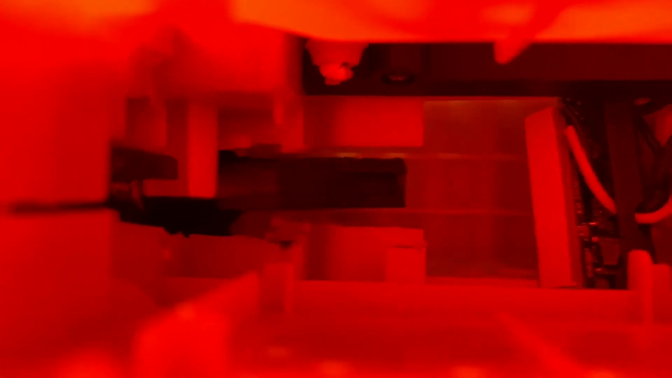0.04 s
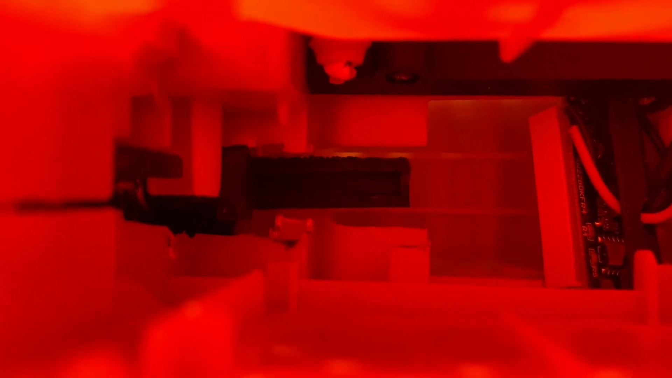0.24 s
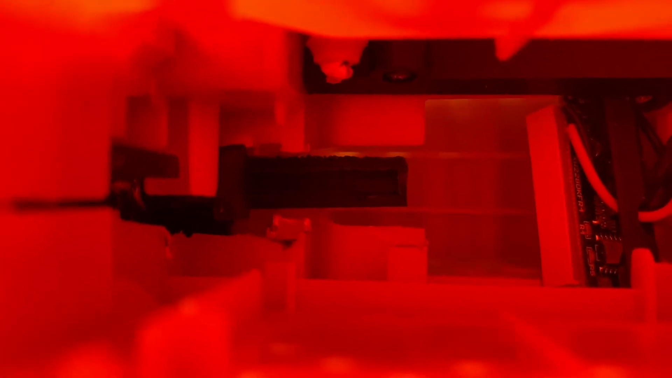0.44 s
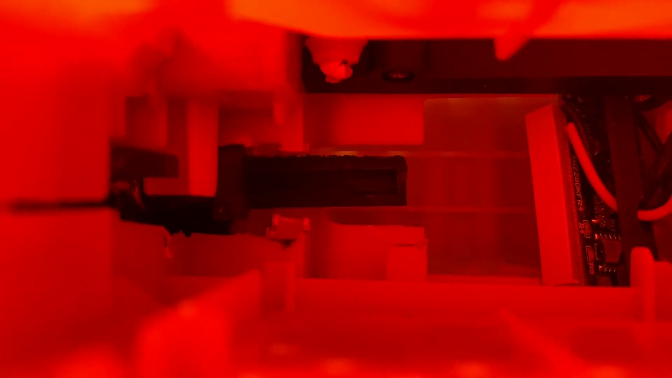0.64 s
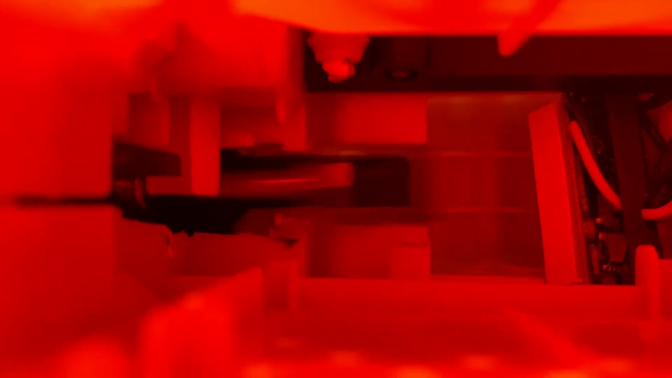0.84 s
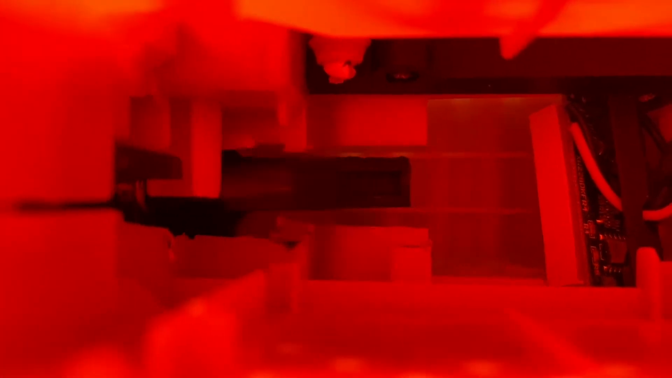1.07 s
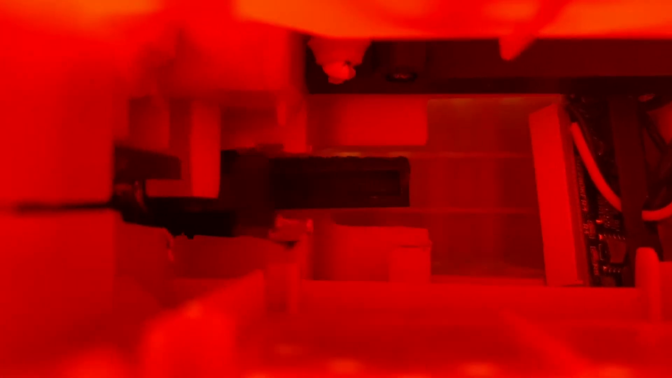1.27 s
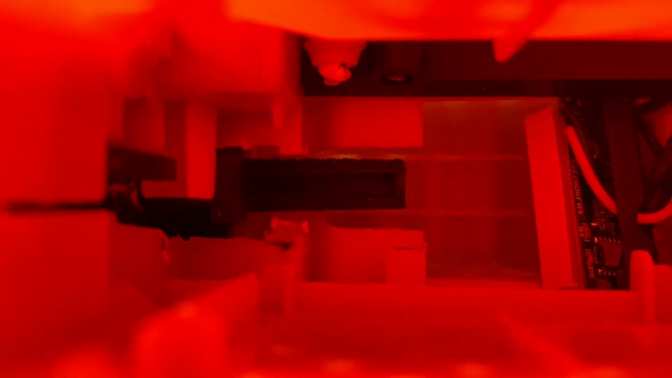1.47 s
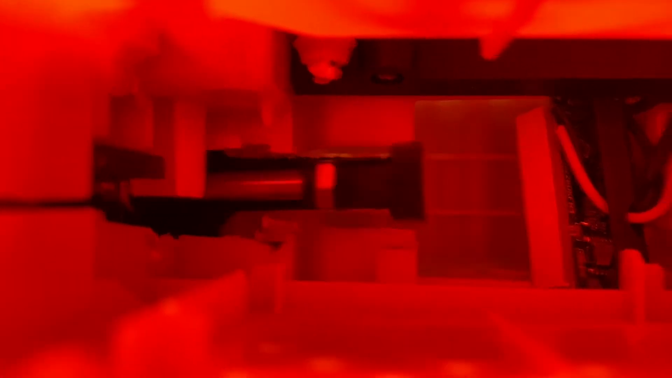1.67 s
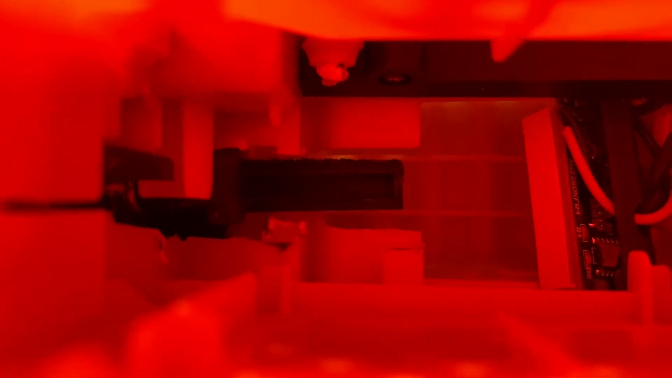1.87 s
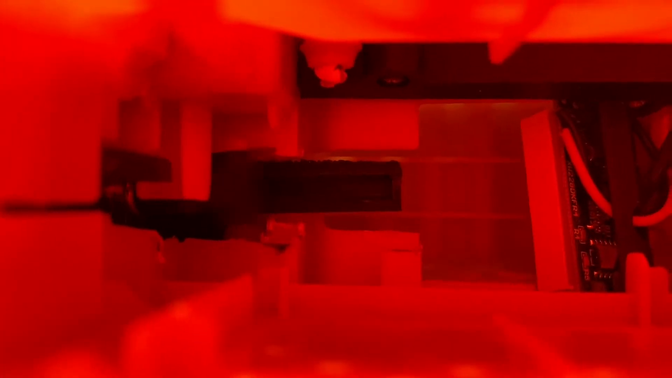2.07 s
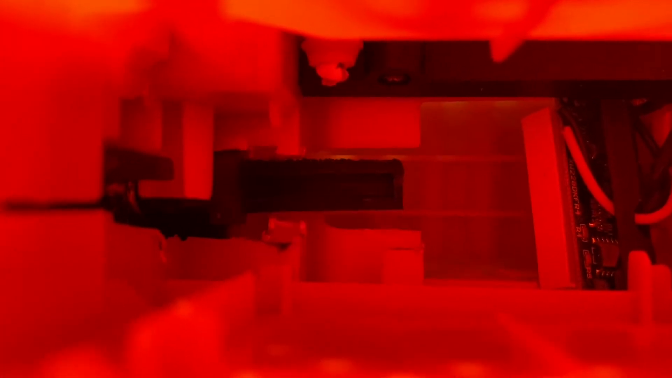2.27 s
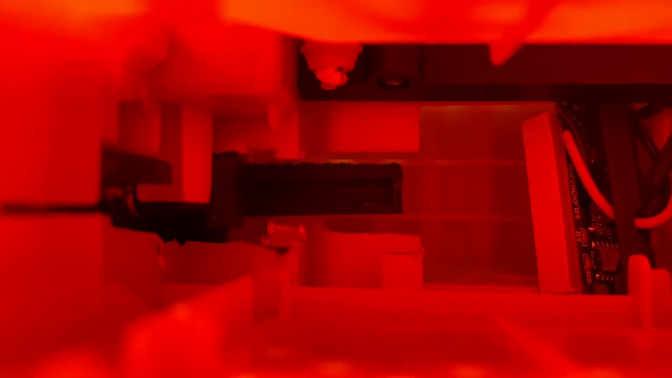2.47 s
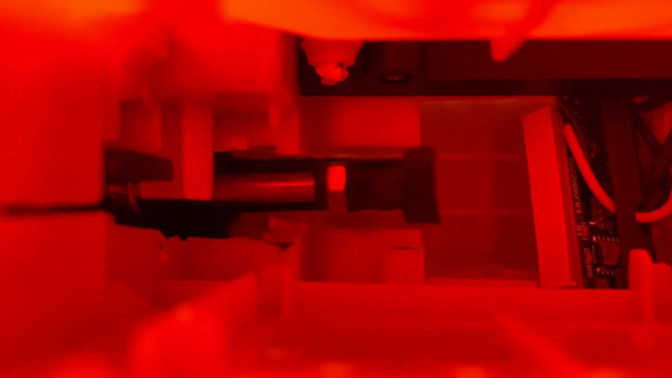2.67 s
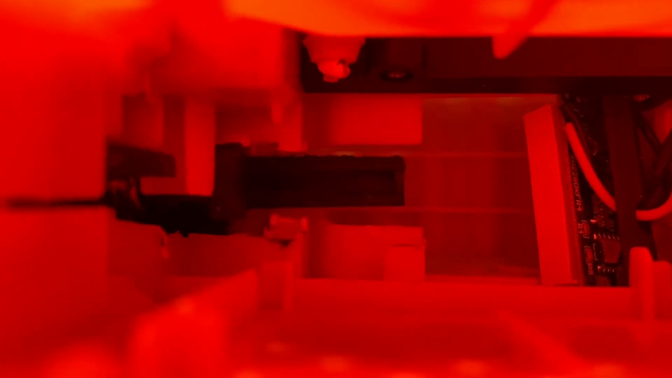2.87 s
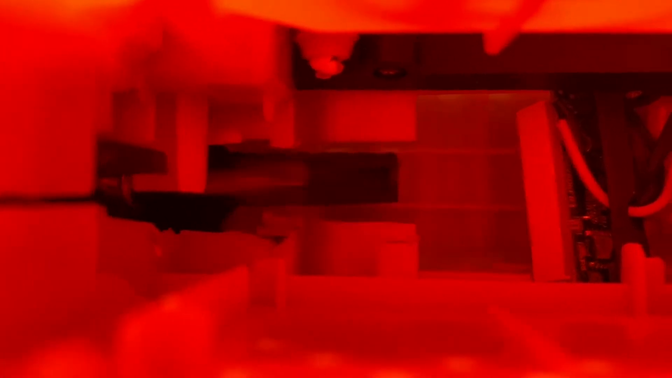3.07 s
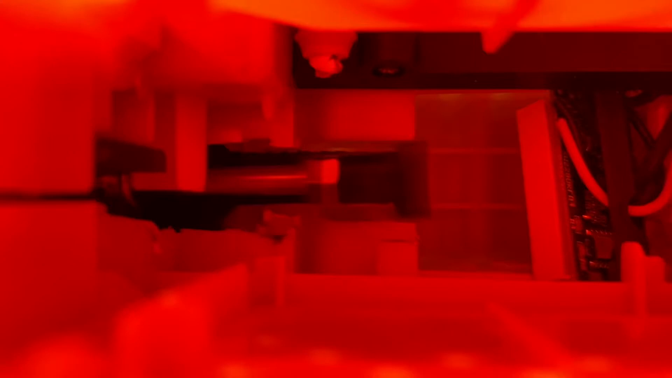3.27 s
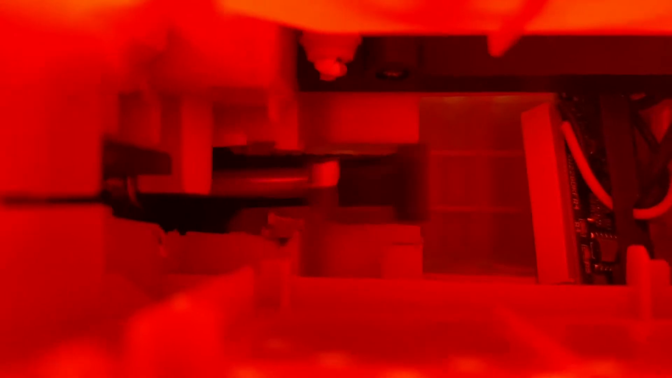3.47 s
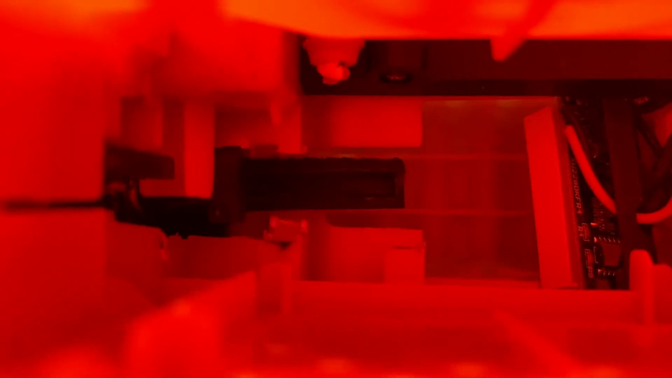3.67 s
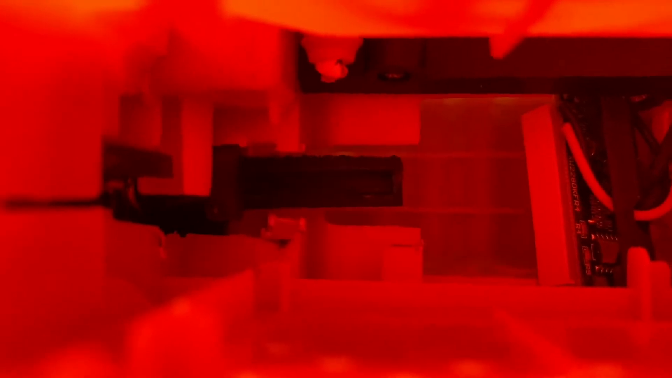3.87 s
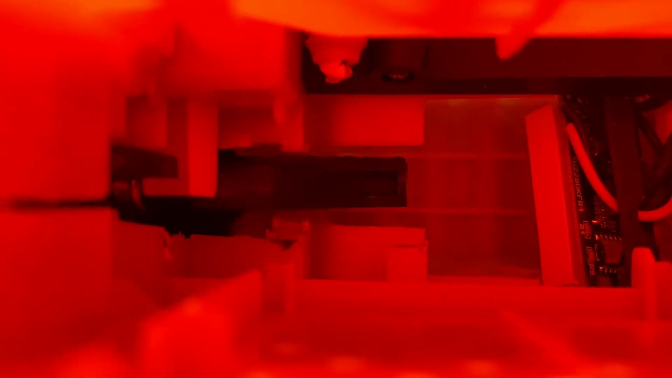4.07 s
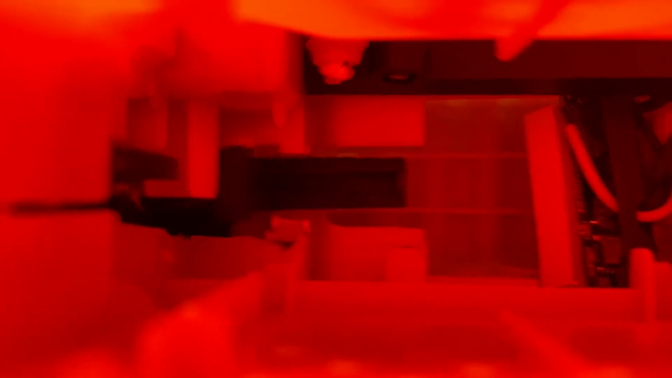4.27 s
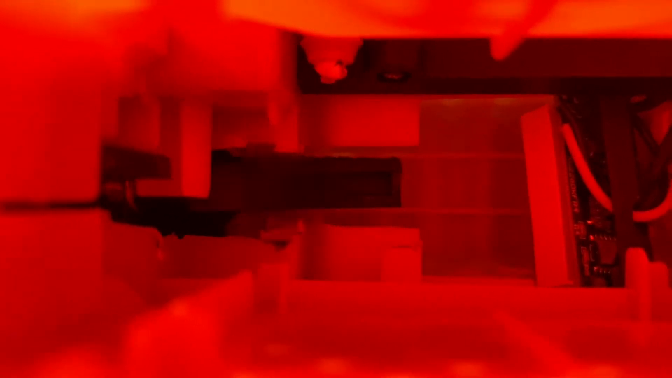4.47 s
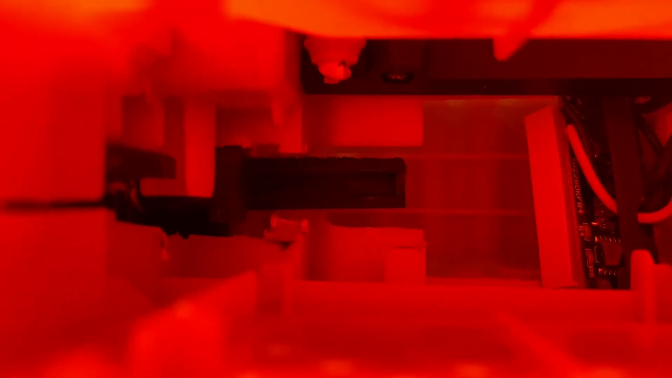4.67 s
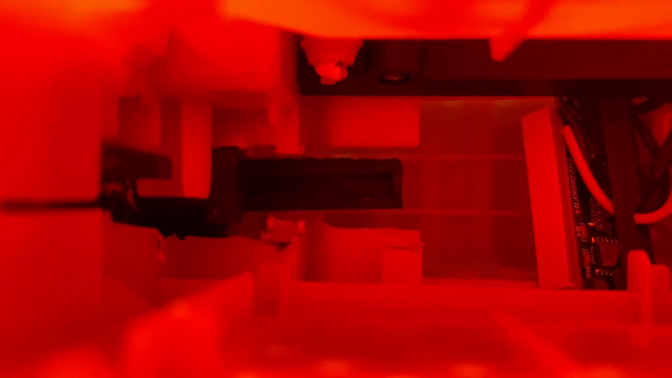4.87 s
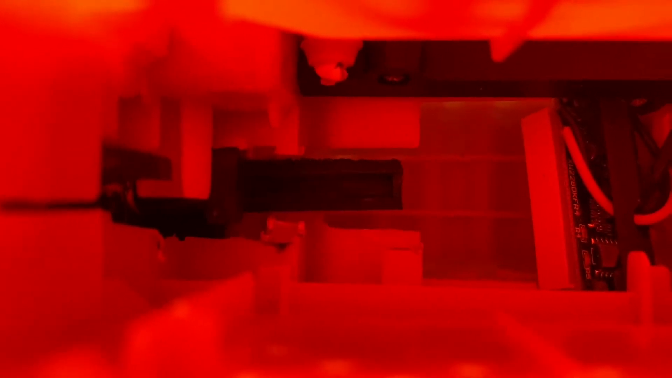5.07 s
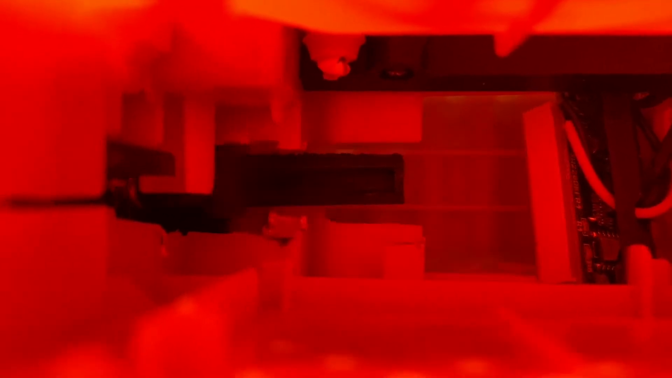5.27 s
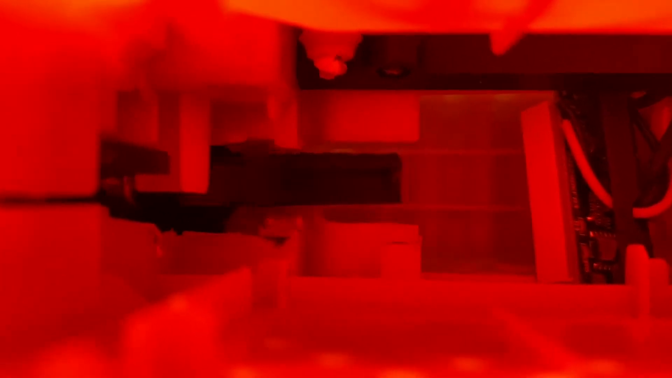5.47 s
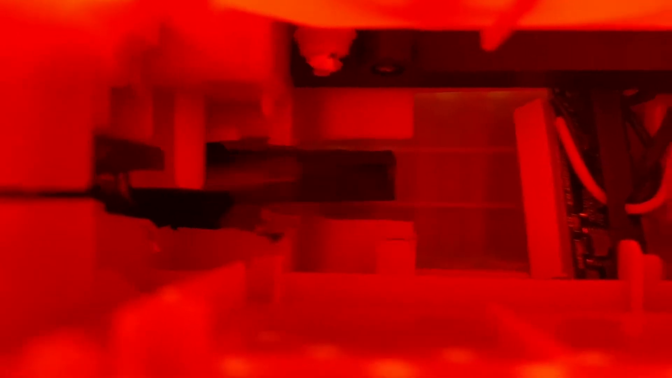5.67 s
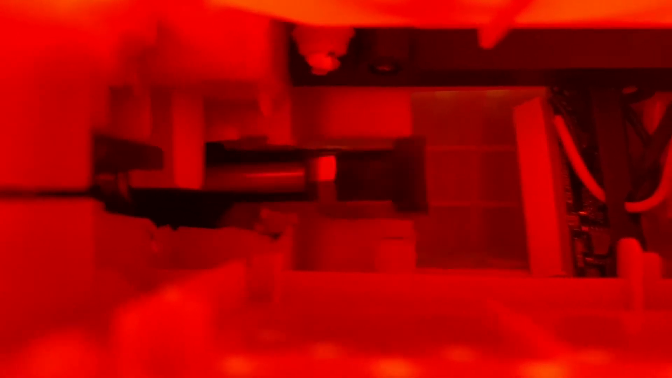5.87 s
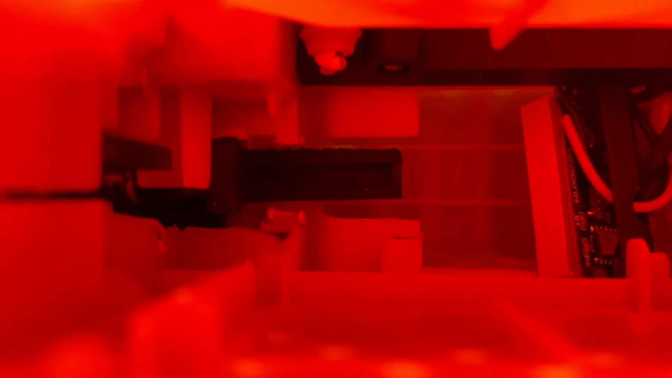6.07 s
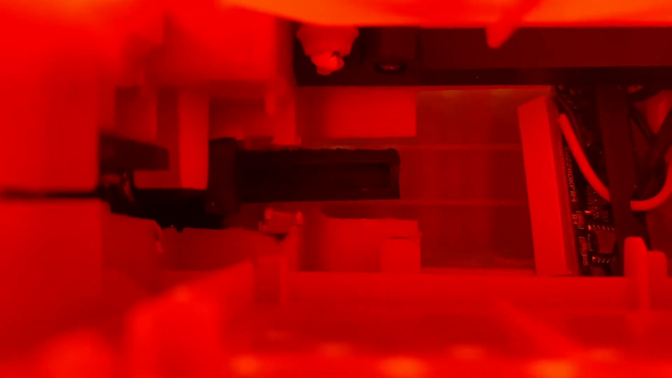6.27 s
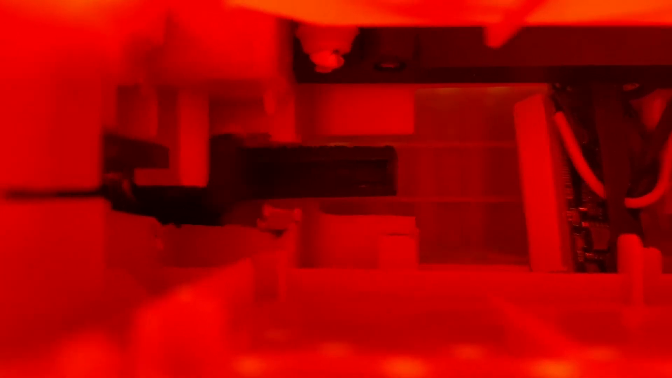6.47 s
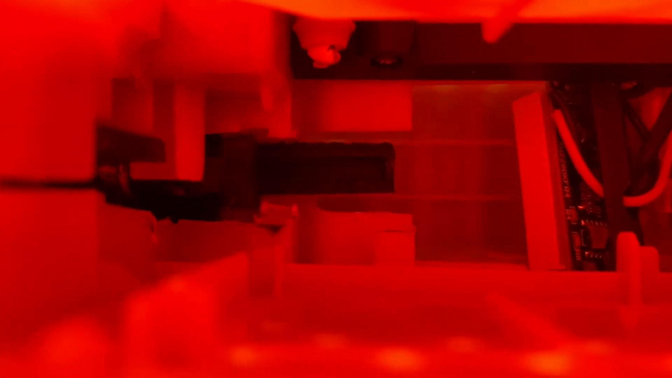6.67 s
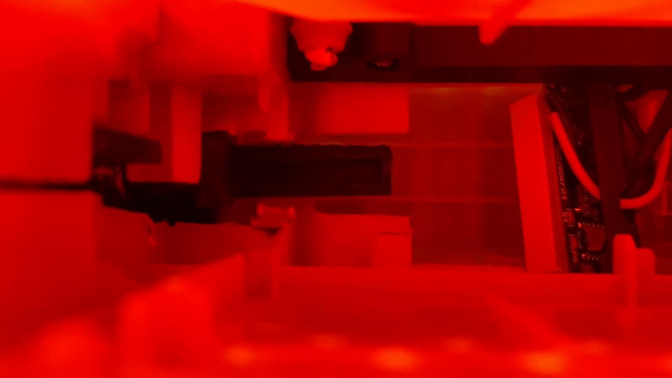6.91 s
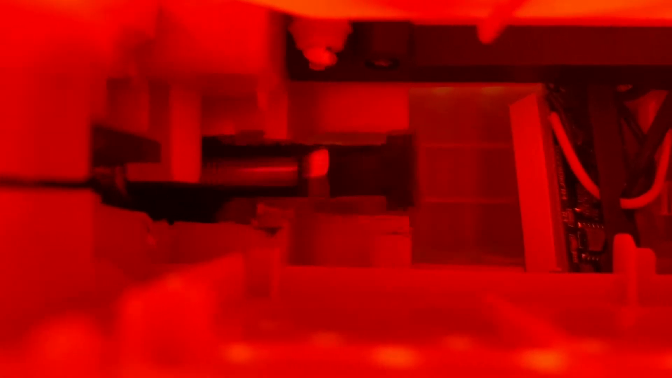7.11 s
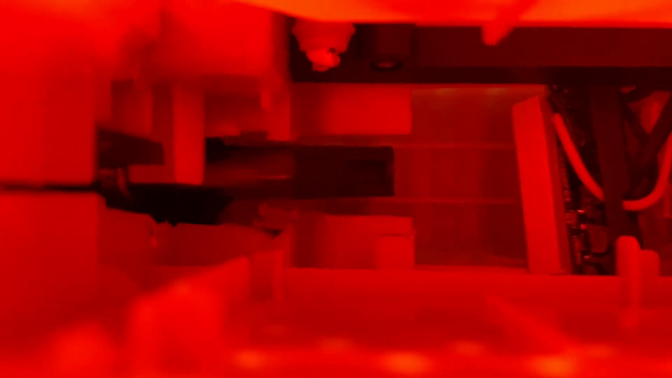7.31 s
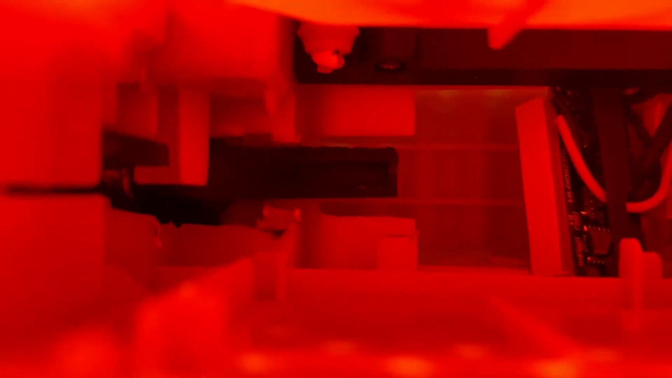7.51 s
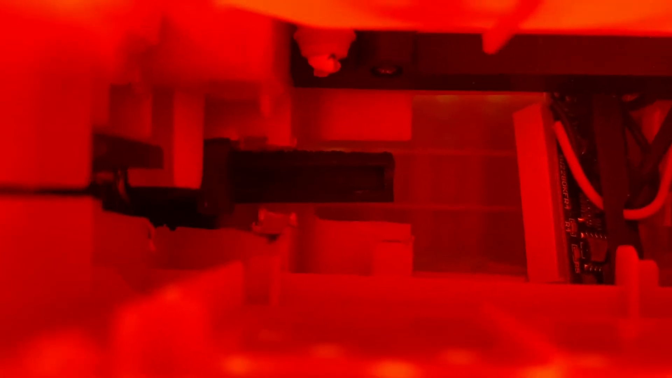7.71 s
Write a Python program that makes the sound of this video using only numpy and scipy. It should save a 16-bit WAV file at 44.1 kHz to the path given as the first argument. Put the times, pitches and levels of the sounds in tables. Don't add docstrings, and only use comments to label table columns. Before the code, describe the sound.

Held right against the microphones, a small solenoid pusher clatters inside a hollow plastic shell. A faint trigger click precedes each burst of hard, fast slams and spring-driven returns, about sixteen cycles a second. Loose parts rattle and buzz briefly afterwards. Short quiet gaps hold finger ticks, soft rubs and low grip rumble in a quiet room. The blows are loud enough to distort.

```python
import sys
import numpy as np
from scipy import signal
from scipy.fft import rfft, irfft, next_fast_len
from scipy.io import wavfile
from scipy.ndimage import map_coordinates

SR = 44100
rng = np.random.default_rng(int(sys.argv[2]) if len(sys.argv) > 2 else 0)


def generate_wav(sig):
    pcm = np.round(np.clip(np.atleast_2d(sig).T, -1, 1) * 32767).astype(np.int16)
    wavfile.write(sys.argv[1], SR, pcm)


def elevation(decibels):
    levels = np.asarray(decibels, float)
    return 10 ** (levels / 20)


N = 341525

# first slam t/s, last return t/s, slam level/dB, return level/dB, switch level/dB
BURSTS = [(-.0965, .0822, -6.5, -6.5, -45), (0.6898, 0.9372, -5, -7.5, -31.5),
          (1.0808, 1.2603, -4.5, -5.5, -45.5), (1.5818, 1.695, -4.5, -3.5, -36.5),
          (2.094, 2.152, -5.5, -5.5, -35), (2.663, 2.711, -4.5, -5.5, -40.5),
          (2.9330, 3.5562, -4.5, -5, -43), (4.0255, 4.5217, -5, -4.5, -44),
          (5.2184, 5.905, -5.5, -5, -38.5), (6.3545, 6.597, -5.5, -6.5, -45.5),
          (6.9527, 7.5113, -5.5, -4.5, -45.5)]
# f/Hz, width f/Hz, level/dB
SHELL_MODES = [(44.7, 13, -14), (77, 8, -8.5), (135, 37, -10.5), (191, 120, -11), (379.7, 93, 0.2),
               (554, 33, 3.3), (732, 110, 0.57), (812, 340, -26.5), (1020, 190, -9.5), (1268, 110, -2),
               (1518, 180, -5.5)]
# f/Hz, width f/Hz, level/dB
PART_MODES = [(2100, 890, -18), (2650, 840, -2.5), (3627, 240, 1), (4233, 280, -3), (4963, 370, 0),
              (6000, 260, -6.5), (7040, 620, -6.5), (7900, 210, -4), (9500, 490, -10), (11150, 240, -7),
              (12700, 1500, -13), (14960, 1600, -20.5)]


def unit(x):
    return x / np.sqrt(np.mean(x ** 2) + 1e-20)


def along(points, hz):
    f, value = np.transpose(points)
    return np.interp(np.log(hz + 1), np.log(f + 1), value)


def filtered(x, response):
    size = next_fast_len(N + SR // 2)
    hz = np.fft.rfftfreq(size, 1 / SR)
    return irfft(rfft(x, size) * response(hz), size)[..., :N]


def ring(force, modes):
    f = np.fft.rfftfreq(32768, 1 / SR)
    early = 2048
    body = 0
    for k, (center, width, db) in enumerate(modes):
        mode = 1j * f * width / (center * center - f * f + 1j * f * width)
        body = body + (-1) ** k * elevation(db) * mode
    return signal.fftconvolve(force, np.roll(irfft(body), early))[early:][:N]


def add(track, s, sound):
    start = round(s * SR)
    sound = sound[max(-start, 0):]
    part = track[max(start, 0):][:len(sound)]
    part += sound[:len(part)]


def grit(count, spiky_db):
    return unit(rng.standard_normal(count) * elevation(spiky_db * rng.exponential(size=count)))


def clumps(count, rate, depth_db):
    knots = np.clip(rng.standard_normal(int(count * rate / SR) + 4), -2, 1.6)
    return elevation(depth_db * map_coordinates(knots, [np.arange(count) * rate / SR]))


def push(t, width):
    return np.exp(-((t - 2 * width) / width) ** 2)


def click(t, hz, t60, drift):
    tone = np.sin(2 * np.pi * hz * t + np.cumsum(rng.normal(0, drift, len(t))))
    return elevation(-60 * t / t60) * (1 - np.exp(-t / 0.00013)) * tone


def returns():
    cycle_s = .0633
    first_hold_s = .0545
    limp_s = .001
    limp_slam_db, limp_return_db = 0.8, -1
    tires_db_per_s = -2.5
    rows = []
    for first, last, slam_db, home_db, _ in BURSTS:
        gaps = round((last - first - first_hold_s) / cycle_s)
        early = np.arange(gaps + 1) % 2
        steady = np.linspace(first + first_hold_s, last + 2 * limp_s * early[-1], gaps + 1)
        for k, s in enumerate(steady - 2 * limp_s * early):
            tired_db = tires_db_per_s * (s - (first + last) / 2)
            limp = early[k] - .5
            db = home_db + tired_db + limp_return_db * limp
            next_db = slam_db + tired_db + limp_slam_db * limp if k < gaps else None
            rows.append((s, db, next_db, early[k]))
    return rows


def slams():
    first_db, first_chatter_s = 1.5, 0.01
    flight_s, limp_flight_s = .0292, 0.00034
    chatter_s, limp_chatter_s = .0135, 0.0093
    rows = [(first, db + first_db, first_chatter_s) for first, _, db, *_ in BURSTS]
    for s, _, db, early in returns():
        if db is not None:
            length = limp_chatter_s if early else chatter_s
            rows.append((s + flight_s + limp_flight_s * early, db, length))
    return rows


def room_air():
    # f/Hz, level/dB per Hz
    air_curve = [
        (15, -31.5),
        (25, 5),
        (55, 3.5),
        (394, -18),
        (427, -10.5),
        (887, -31),
        (1650, -31.5),
        (16000, -43.5),
    ]
    apart = lambda f: np.clip(f / 700, .15, 1)
    shape = lambda f: elevation(along(air_curve, f)) * [np.ones_like(f), apart(f)]
    mid, side = filtered(rng.standard_normal((2, N)), shape)
    return elevation(-67.5) * np.array([mid + side, mid - side]) / np.std(mid)


def grip():
    # t/s, level/dB, f/Hz, half length t/s
    grip_shifts = [(0.178, -35.5, 69, 0.092), (.33, -44.5, 111.5, 0.03), (0.355, -45.5, 71.2, 0.053),
                   (.31, -52, 251, .025), (0.25, -45, 426, 0.021), (.38, -52, 153.5, 0.076),
                   (.46, -54.5, 124.4, 0.079), (0.545, -52, 390, 0.012), (1.403, -45, 50, 0.056),
                   (1.916, -58, 50.2, 0.06), (2.266, -32, 467, 0.0065), (2.338, -50, 60.4, 0.05),
                   (3.797, -47, 72.9, 0.058), (3.944, -63, 70, 0.042), (6.019, -48, 69.6, .05),
                   (6.135, -66, 300, 0.012), (6.799, -58, 70, 0.05), (7.671, -53, 59.4, 0.056)]
    out, t = np.zeros(N), np.arange(-6000, 6000) / SR
    for s, db, hz, half in grip_shifts:
        drift = np.cumsum(rng.normal(0, .04, len(t)))
        add(out, s + t[0], elevation(db) * np.exp(-(t / half) ** 2) * np.sin(2 * np.pi * hz * t + drift))
    return out


def background():
    return room_air() + grip() * elevation([[.4], [-.4]])


def rubs():
    # t/s, level/dB, half length t/s
    finger_slides = [
        (0.576, -64, .02),
        (2.035, -65.5, 0.037),
        (2.58, -65, .03),
        (3.847, -70, .012),
        (5.071, -73, .035),
        (6.205, -70, 0.026),
    ]
    force, t = np.zeros(N), np.arange(-3000, 3000) / SR
    for s, db, half in finger_slides:
        swell = np.exp(-(t / half) ** 2)
        add(force, s + t[0], elevation(db + 11) * swell * grit(len(t), spiky_db=1.5))
    return ring(force, [(3200, 500, -6), (5100, 840, 0.0)])


def ticks():
    # t/s, level/dB, f/Hz, knock share level/dB
    finger_ticks = [(0.2266, -40.5, 2690, 10), (0.2652, -49.5, 8100, 4), (0.408, -65.5, 7700, 3),
                    (0.5284, -37.5, 2310, 5), (0.571, -51.5, 3030, 5.5), (0.619, -42, 3095, -21.5),
                    (1.4724, -62, 2920, -2.5), (1.89, -47, 3450, 2.5), (1.906, -53, 4740, -2),
                    (2.0295, -51.5, 2000.0, 0), (2.5612, -58, 5100.0, -10), (3.6932, -54, 2485, 8),
                    (3.8096, -45, 2390, 1), (3.8463, -59.5, 3020, 1.5), (3.8852, -57, 3023, -1.5),
                    (3.9119, -53.5, 3070, -18.5), (3.9344, -50, 3030, -12), (3.9496, -61, 2250, -21.5),
                    (3.9706, -61, 2250, -11.5), (4.6497, -47.5, 7880, -9), (4.6577, -57.5, 7900.0, -1.0),
                    (5.0966, -59.5, 3094, -15), (5.1327, -53, 3200.0, -26), (5.1514, -48.5, 2940, -14),
                    (6.1445, -56, 1533, 13.5), (6.1706, -50, 2100.0, 4), (6.1988, -63, 3200.0, -11.5),
                    (6.2734, -57, 3200.0, -12.5)]
    # f/Hz, width f/Hz, level/dB
    switch_modes = [
        (2250, 130, 2.5),
        (3200, 1200, -1),
        (4900, 250, 1),
        (7500, 2200, -14.5),
    ]
    switch_lead_s, switch_hz, switch_knock_db = .0372, 3150, -17.5
    closings = [(s - switch_lead_s, db, switch_hz, switch_knock_db) for s, *_, db in BURSTS]
    tone, force, knock, t = np.zeros(N), np.zeros(N), np.zeros(N), np.arange(1500) / SR
    for s, db, hz, knock_db in finger_ticks + closings:
        start = s - .0005
        contact = elevation(-60 * t / 0.019) * (1 - np.exp(-t * 4000))
        add(tone, start, elevation(db - 4) * click(t, hz, t60=.03, drift=.05))
        add(force, start, elevation(db + 7.0) * contact * grit(len(t), spiky_db=2.0))
        add(knock, start, elevation(db + knock_db + 15.5) * push(t, width=0.000087))
    return tone + ring(force, switch_modes) + ring(knock, SHELL_MODES)


def settling(time):
    # length t/s, first level/dB, last level/dB
    buzz_slopes = [(.11, -34, -37.5), (0.073, -39.5, -33), (.065, -38.5, -35), (0.11, -19.5, -31.5),
                   (0.1, -24, -38.5), (.08, -26, -28.5), (0.067, -39, -33.5), (0.071, -34.5, -35.5),
                   (.067, -40, -37.5), (0.11, -24.5, -36.5), (0.069, -37, -38.5)]
    wait_s, rest_s, rest_db = .0095, .031, -60
    level = 0
    for (_, last, *_), (length, first_db, last_db) in zip(BURSTS, buzz_slopes):
        since = time - last - wait_s
        corners_s, corners_db = [0, length, length + rest_s], [first_db, last_db, rest_db]
        level = level + elevation(np.interp(since, corners_s, corners_db, left=-200, right=-200))
    return level


def scrape():
    buzz = unit(clumps(N, rate=200, depth_db=2.5) * grit(N, spiky_db=2))
    force = settling(np.arange(N) / SR) * buzz
    return elevation(7.0) * ring(force, PART_MODES) + elevation(19.0) * ring(force, SHELL_MODES)


def shaken():
    # t/s from slam, level/dB under it, scatter level/dB
    guide_clip = (-.0118, -8, 2.5)
    guide_pitches = [2570, 3300, 4800, 7100, 7800]
    # t/s from that return, level/dB under it, f/Hz, scatter level/dB
    spring_ping = (0.02, -12, 11198, 2)
    # t/s from slam, level/dB under it, f/Hz
    seat_drop = (.035, -25, 4600)
    # t/s from slam, level/dB under it, f/Hz, scatter level/dB
    coil_jiggle = (-0.0032, -8, 8200.5, 2)
    guide_s, guide_db, guide_scatter_db = guide_clip
    ping_s, ping_db, ping_hz, ping_scatter_db = spring_ping
    seat_s, seat_db, seat_hz = seat_drop
    jiggle_s, jiggle_db, jiggle_hz, jiggle_scatter_db = coil_jiggle

    strokes = slams()
    opening, later = strokes[:len(BURSTS)], strokes[len(BURSTS):]
    luck = rng.standard_normal((len(later), 4))
    pick = rng.choice(guide_pitches, len(later))
    rows = [(s + seat_s, db + seat_db, seat_hz) for s, db, _ in opening]
    for (s, db, _), (a, b, c, d), hz in zip(later, luck, pick):
        rows.append((s + guide_s + .0015 * a, db + guide_db + guide_scatter_db * b, hz))
        rows.append((s + jiggle_s + .003 * c, db + jiggle_db + jiggle_scatter_db * d, jiggle_hz))
    for s, db, _, early in returns():
        if early:
            a, b = rng.standard_normal(2)
            rows.append((s + ping_s, db + ping_db + ping_scatter_db * a, ping_hz * (1 + .08 * b)))
    return rows


def rattles():
    # t/s, level/dB, f/Hz
    tumbles = [(0.1018, -20, 2480), (0.144, -23.5, 6540), (0.1624, -20.5, 5880), (.197, -24.5, 4620),
               (0.9848, -18.5, 7800), (1.0064, -25.5, 7800), (1.3053, -18, 6580), (1.7183, -15.5, 8130),
               (1.7568, -12, 6120), (1.798, -19.5, 10650), (2.1693, -13.5, 3300), (2.1791, -22, 2440),
               (2.198, -7.5, 2390), (2.2066, -9, 7900), (2.2576, -24.5, 9650), (2.752, -13.5, 7800),
               (2.769, -3, 4800), (2.7991, -18.5, 6600), (2.8315, -23.5, 7900), (3.5708, -19.5, 7900),
               (3.6012, -17.5, 7800), (3.6088, -18.5, 6480), (4.5697, -19.5, 7690), (5.9256, -23.5, 4163),
               (5.9519, -20.5, 6530), (6.626, -21.5, 8910), (6.6475, -4, 5930), (6.678, -20, 6650),
               (7.5498, -22.5, 7630), (7.5741, -21.5, 7800)]
    tone, force, t = np.zeros(N), np.zeros(N), np.arange(1500) / SR
    for s, db, hz in tumbles + shaken():
        add(tone, s - .001, elevation(db - 4.0) * click(t, hz, t60=0.05, drift=0.45))
        add(force, s - .001, elevation(db + 7.0) * elevation(-60 * t / 0.019) * grit(len(t), spiky_db=1.5))
    return tone + ring(force, PART_MODES) + elevation(1.5) * ring(force, SHELL_MODES)


def core():
    # f/Hz, width f/Hz, level/dB
    steel_modes = [
        (7230, 1000, -0.5),
        (9800, 890, -3),
        (11400, 2300, -4.5),
        (12760, 250, 1),
        (14500, 1200, -5.5),
    ]
    force, t = np.zeros(N), np.arange(400) / SR
    snap = push(t, width=.0012)
    for s, db, _ in slams():
        add(force, s + .0004, elevation(db + 6 + rng.normal(0, 2.2)) * snap * grit(len(t), spiky_db=5.5))
    return ring(force, steel_modes)


def thud():
    out, t = np.zeros(N), np.arange(1500) / SR
    glide_hz = 310 + 440 * np.exp(-t / 0.006)
    swell = elevation(-60 * t / 0.033) * (1 - np.exp(-t / 0.002))
    wave = np.sin(2 * np.pi * np.cumsum(glide_hz) / SR) * swell
    for s, db, *_ in returns():
        add(out, s - .001, elevation(db - 2.2) * wave)
    for s, db, _ in slams():
        add(out, s + .0035, -elevation(db + 1.5) * wave)
    return out


def add_slam(crack, knock, s, db, length, habit):
    t = np.arange(len(habit)) / SR
    knock_lag_s = .0012
    stop = elevation(-60 * np.clip(t - length, 0, None) / .016)
    bounce = .42 * np.exp(-((t - length + .0015) / .002) ** 2)
    chatter = (elevation(-60 * t / 0.044) + bounce) * stop * (1 - np.exp(-t * 2500))
    wake = np.clip(t / .028, 0, 1) ** 3
    held = elevation(-16.5 - 60 * t / 0.25) * wake * clumps(len(t), rate=230, depth_db=7.0)
    add(crack, s - .0005, elevation(db + 10.8) * (chatter + held) * grit(len(t), spiky_db=2.2))

    blows = 3 * push(t - .002, width=0.00017) - 0.42 * push(t - .005, width=0.0005)
    shake = .8 * habit + .6 * grit(len(t), spiky_db=3)
    tremor = (3.09 * elevation(-60 * t / 0.074) * stop + 3 * held) * shake
    add(knock, s + knock_lag_s, elevation(db + 7) * (blows + tremor))

    gain_speed = elevation(-900 * t[1649::-1]) * (1 - elevation(-600 * t[:1650]))
    run_up = gain_speed * clumps(1650, rate=360, depth_db=3.0)
    start = s - len(run_up) / SR
    add(crack, start, elevation(db - 3.5) * run_up * grit(len(run_up), spiky_db=3))
    add(knock, start, elevation(db + 0.5) * run_up * grit(len(run_up), spiky_db=3.5))


def add_return(crack, knock, s, db, habit):
    t = np.arange(len(habit)) / SR
    fade = elevation(-60 * t / 0.28) * (1 - (t / t[-1]) ** 4)
    loose = 0.69 * elevation(-60 * t / 0.053) + 0.51 * fade * clumps(len(t), rate=460, depth_db=5.5)
    add(crack, s - .001, elevation(db - 9.0) * loose * grit(len(t), spiky_db=2))

    blows = -push(t, width=0.00015) + .5 * push(t - .0018, width=0.0003)
    blows += 0.51 * push(t - .0072, width=0.00049) + 0.22 * push(t - .013, width=0.00052)
    shake = .85 * habit + .5 * grit(len(t), spiky_db=3)
    add(knock, s - .0015, elevation(db + 9) * (blows + .5 * fade * shake))


def plunger():
    crack, knock = np.zeros(N), np.zeros(N)
    out_habit, home_habit = grit(2600, spiky_db=2.0), grit(2600, spiky_db=4.0)
    for s, db, length in slams():
        add_slam(crack, knock, s, db, length, out_habit)
    for s, db, *_ in returns():
        add_return(crack, knock, s, db, home_habit)
    return ring(crack, PART_MODES) + ring(knock, SHELL_MODES)


def ports(x):
    # f/Hz, level/dB
    left_lean = [
        (60, 1),
        (200, 2),
        (500, 2.5),
        (750, 4),
        (1000, 2),
        (1300, 11),
        (2400, 13),
        (5000, 9),
        (6600, 0),
        (15000, -.5),
    ]
    # f/Hz, angle/rad
    left_lead = [(0, 0), (80, 0), (180, .7), (400, .9), (600, 1.7), (700, 2.6), (1000, 3), (1150, 4.6),
                 (1700, 7), (2100, 6.3), (6800, 6.3), (9000, 3.2), (11000, 0), (16000, -6.9)]
    # f/Hz, level/dB
    smear_curve = [
        (60, -12),
        (150, -5),
        (300, -13),
        (700, -13),
        (1200, -3),
        (2500, -3),
        (6000, -6),
        (9000, -7),
    ]
    t = np.arange(400) / SR
    smear = rng.standard_normal(len(t)) * elevation(-60 * t / .011)
    smeared = signal.fftconvolve(x, smear / np.linalg.norm(smear))[:N]
    smeared = filtered(smeared, lambda f: elevation(along(smear_curve, f)))
    wander = map_coordinates(rng.standard_normal(900), [np.arange(N) * 90 / SR])
    lead = lambda f: np.exp(-1j * np.interp(f, *np.transpose(left_lead)))
    shadow = lambda f: elevation(-along(left_lean, f)) * lead(f)
    far = filtered(.85 * x + 1.3 * wander * smeared, shadow)
    return np.array([x, far])


def room(x):
    # f/Hz, t/s
    decay_curve = [
        (200, .45),
        (700, .27),
        (1500, .29),
        (5000, .27),
        (8000, .22),
        (14000, .1),
    ]
    hz, t, z = signal.stft(rng.standard_normal((2, SR // 2)), SR, nperseg=256)
    fade = elevation(-60 * t / along(decay_curve, hz)[:, None])
    tail = signal.istft(z * fade, SR, nperseg=256)[1]
    late = np.pad(x, (300, 0))[None]
    return signal.fftconvolve(late, tail / np.linalg.norm(tail[0]), axes=1)[:, :N]


def scene():
    toy = rubs() + ticks() + scrape() + rattles() + core() + thud() + plunger()
    answer = elevation(-34) * room(toy)
    return background() + answer + ports(toy)


def low_pass(x):
    return signal.sosfilt(signal.butter(12, 16410, fs=SR, output="sos"), x)


def record(dry):
    top, hard = 1.12, 12
    low_hz, top_hz = 30, 15900
    flat = dry / (1 + np.abs(dry / top) ** hard) ** (1 / hard)
    treble_edge = lambda f: np.cos(np.pi / 2 * np.clip((f - top_hz) / 500 + .8, 0, 1)) ** 2
    bass_edge = lambda f: 1j * f / (low_hz + 1j * f)
    return low_pass(filtered(flat, lambda f: treble_edge(f) * bass_edge(f)))


dry = scene()
out = record(dry)
generate_wav(out)
```